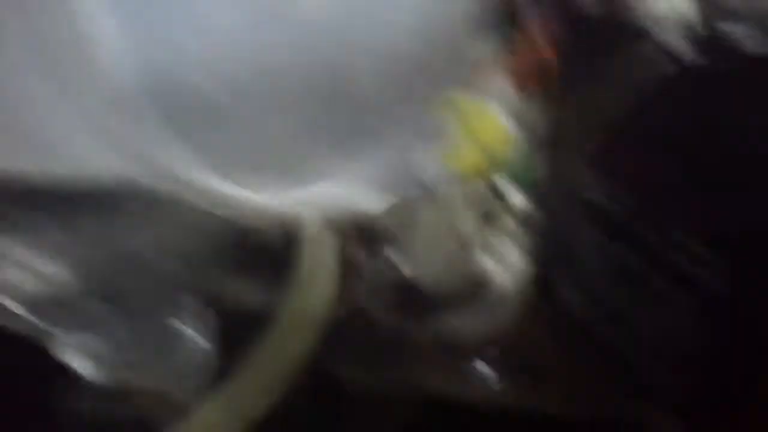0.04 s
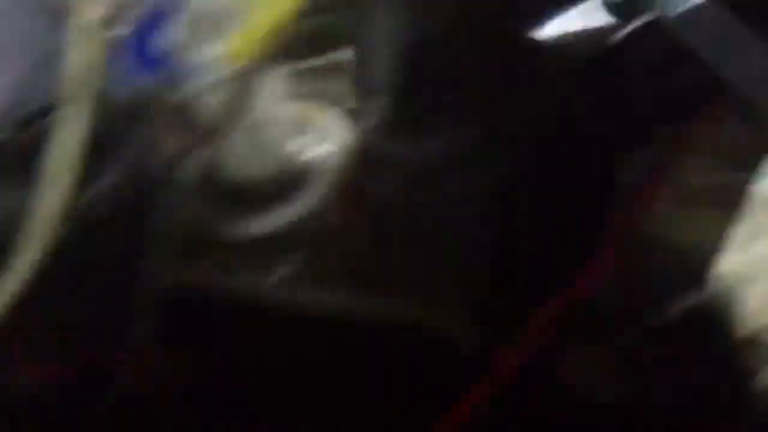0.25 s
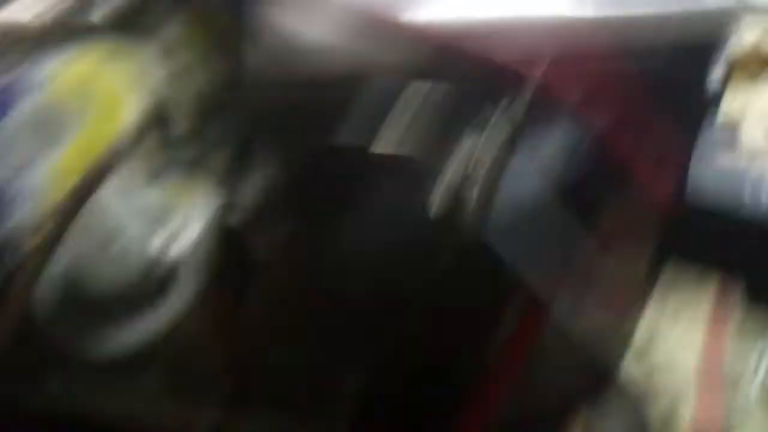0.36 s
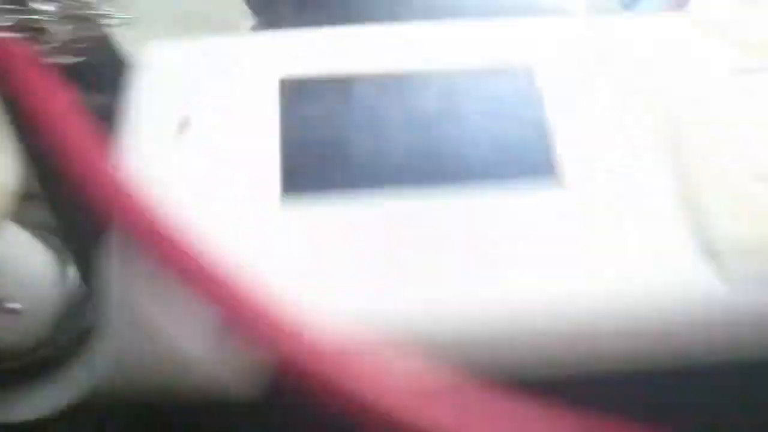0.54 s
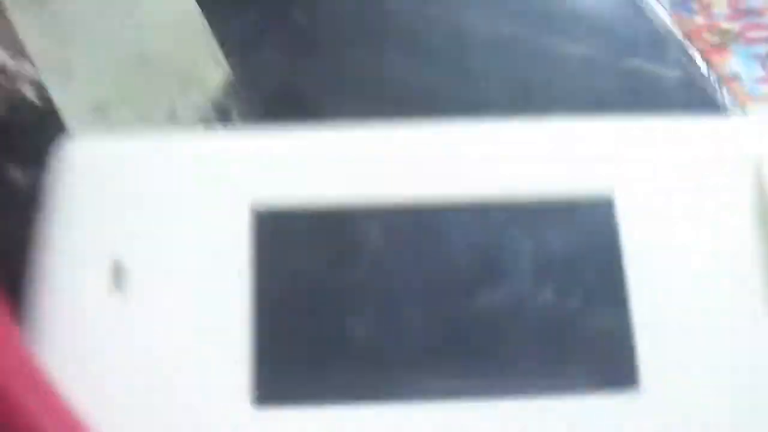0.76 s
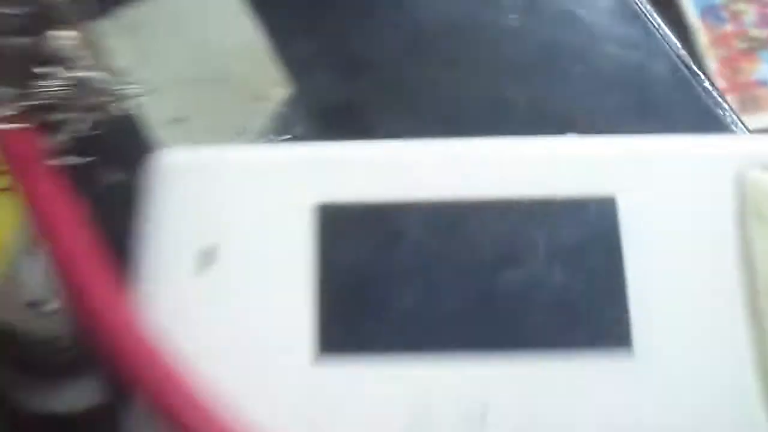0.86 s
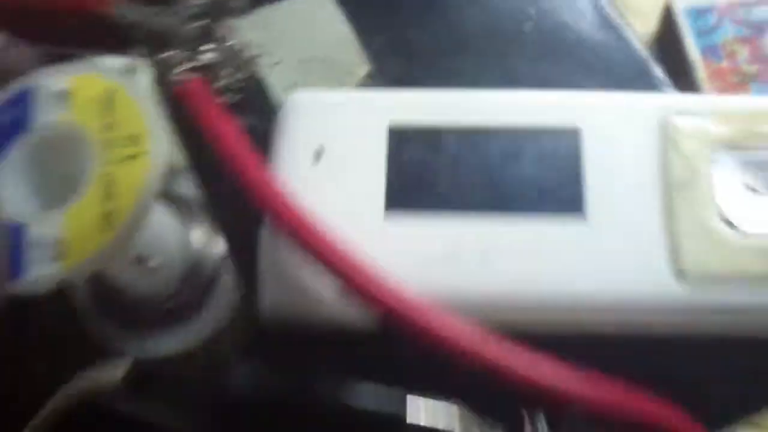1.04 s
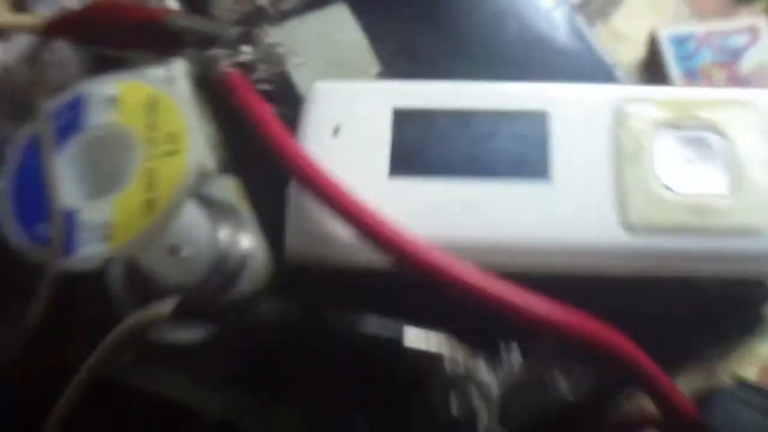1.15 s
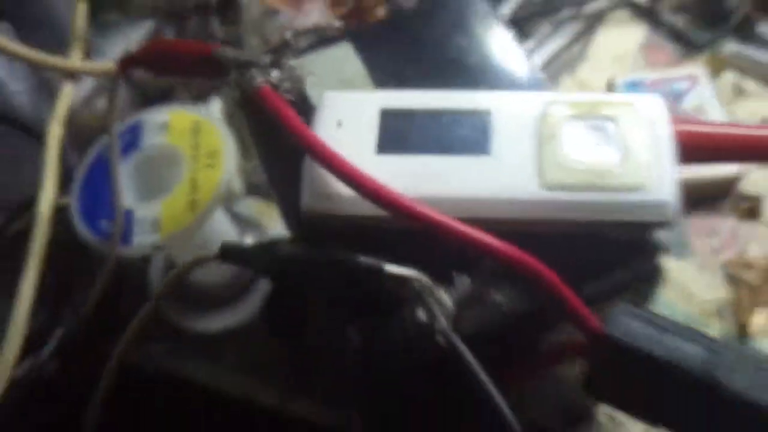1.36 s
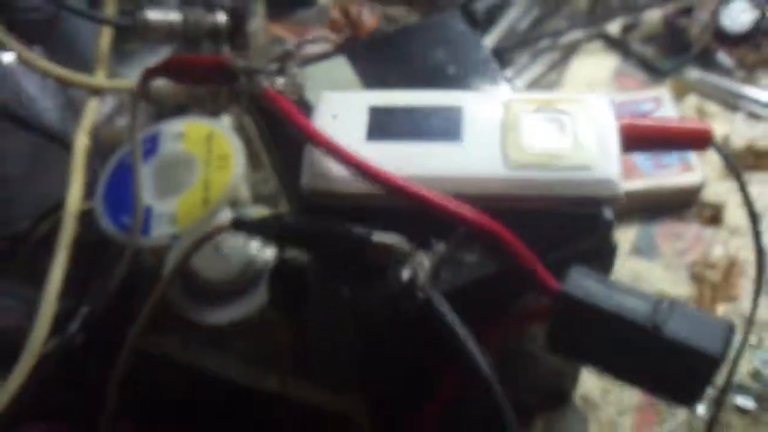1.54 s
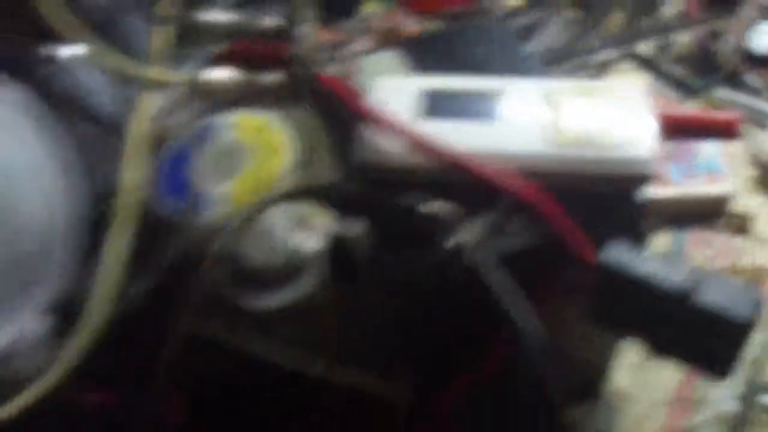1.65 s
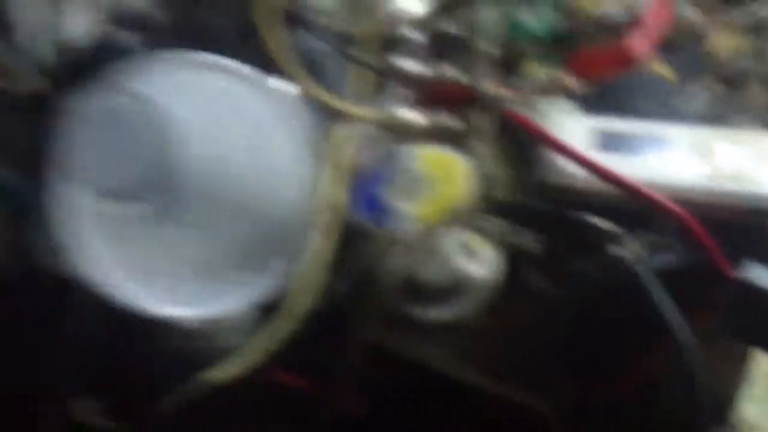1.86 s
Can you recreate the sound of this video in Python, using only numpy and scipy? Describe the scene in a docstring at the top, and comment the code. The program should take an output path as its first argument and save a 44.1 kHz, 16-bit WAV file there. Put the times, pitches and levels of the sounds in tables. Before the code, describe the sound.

A hand bumps and rubs a handheld camera, with quiet electrical hum and hiss behind.

```python
"""A hand rumbles on the case of a handheld camera, right at its microphone, over an electronics bench.
One shift of grip gives a cluster of dull knocks, brushes of skin and small plastic ticks; fainter knocks
and ticks follow. Farther off in the small room, equipment hums, whirs and whines under a steady hiss.
The treble of that background drops away briefly during the cluster."""
import sys
import numpy as np
from scipy import signal
from scipy.fft import rfft, irfft
from scipy.io import wavfile

SR = 44100
rng = np.random.default_rng(int(sys.argv[2]) if len(sys.argv) > 2 else 0)


def store_pcm(level_fs):
    """Save levels as 16-bit WAV."""
    pcm = np.round(np.clip(level_fs, -1, 1) * 32767).astype(np.int16)
    wavfile.write(sys.argv[1], SR, np.atleast_2d(pcm).T)


N = 83790
TIME = np.arange(N) / SR
FREQ = np.fft.rfftfreq(N, 1 / SR)

# Hiss and room air. Each row: frequency in Hz, relative level in dB.
HISS_SPECTRUM = [(25, 13), (100, 10.5), (200, 6.5), (400, 1), (560, 3.5), (700, -2), (980, -1), (1400, -6),
                 (2000, -6), (2700, -7), (3100, -12), (3800, -11.5), (5500, -14.5), (7000, -18),
                 (8600, -21), (10200, -16), (15500, -16.5)]
# Hum of the equipment. Each row: frequency in Hz, average level in dB.
HUM_TONES = [(412, -86), (599, -81.5), (981, -87), (1253, -86), (1988, -101), (2335, -91), (2608, -94)]
# Its whirring resonance and its thin whine. Each row: time in seconds, level in dB.
WHIR_LEVEL = [(0, -78), (.45, -82.5), (.78, -90), (1.05, -80.5), (1.24, -79), (1.31, -79), (1.37, -81),
              (1.47, -83.5), (1.52, -88), (1.59, -76), (1.7, -89), (1.9, -79)]
WHINE_LEVEL = [(0, -86), (1.1, -88), (1.22, -75.5), (1.31, -73), (1.35, -80), (1.41, -94), (1.435, -99),
               (1.465, -72), (1.52, -95), (1.75, -79), (1.9, -81)]
# The hand's deep sway, and skin creeping on the case. Each row: frequency in Hz, relative level in dB.
SWAY_SPECTRUM = [(8, -21.5), (22, 1), (36, 0.5), (55, -8.5), (78, -16.5), (140, -46), (400, -95)]
CREEP_SPECTRUM = [(25, -21), (55, 3), (80, -1), (140, -8), (280, -24), (450, -33.5), (800, -75),
                  (2500, -100)]
# How sway and creep swell and fade. Each row: time in seconds, level in dB.
SWAY_LEVEL = [(0, -56.5), (.07, -50.5), (.18, -52), (.25, -54), (.33, -45), (.38, -55.5), (.5, -56),
              (.62, -56.5), (.72, -49.5), (.8, -51.5), (.9, -50.5), (1.03, -55), (1.13, -52), (1.26, -54.5),
              (1.45, -61), (1.72, -54.5), (1.8, -47.5), (1.9, -68)]
CREEP_LEVEL = [(0, -66.5), (.06, -61.5), (.12, -62.5), (.2, -48.5), (.24, -43), (.33, -46), (.38, -59),
               (.48, -69), (.62, -62), (.8, -70.5), (.88, -54), (.98, -60), (1.06, -62.5), (1.18, -67),
               (1.32, -60), (1.45, -65.5), (1.57, -55), (1.65, -64.5), (1.76, -78), (1.9, -55.5)]
# Fingers knocking on the case.
# Each row: start in seconds, gain in dB, low-pass corner of the contact in Hz, press +1 or release -1.
KNOCKS = [(0.04, -45.5, 204, -1), (0.1864, -43, 310, 1), (0.2118, -40, 403, -1), (0.228, -28.5, 420, -1),
          (0.2323, -25.5, 123.4, -1), (0.2396, -24.5, 95, 1), (.242, -40.5, 333, 1),
          (0.2546, -28.5, 201, -1), (0.259, -21.5, 62, 1), (0.2742, -23, 65, -1), (0.2859, -38.5, 380, -1),
          (0.2887, -22, 116, 1), (0.2911, -39, 330, 1), (0.308, -37, 420, -1), (0.3129, -26, 152, -1),
          (0.3294, -28.5, 110, -1), (0.3364, -30.5, 363, -1), (0.35, -33, 113, -1), (0.3728, -34, 61, 1),
          (0.438, -47, 706, -1), (.571, -53, 700, 1), (0.609, -46.5, 595, -1), (.703, -47, 900, 1),
          (0.745, -54, 900, 1), (0.8298, -47.5, 400, -1), (.857, -50, 405, -1), (.869, -46.5, 220, 1),
          (.886, -53.5, 354, 1), (0.899, -46, 150, -1), (0.939, -64, 600, 1), (0.978, -50.5, 420, -1),
          (1.021, -44, 100, 1), (1.556, -52, 300, -1), (1.688, -50.5, 900, 1), (1.825, -46.5, 149, 1)]
# Low modes of the case. Each row: frequency in Hz, gain in dB, seconds to fall by 60 dB.
CASE_MODES = [(29, -5.5, .094), (81.6, 3, 0.036), (206, -2.5, 0.019), (269, -15.5, 0.016)]
# A finger brushing the case.
# Each row: midpoint in seconds, half-width in seconds, level in dB, centre in Hz, width in octaves.
BRUSHES = [(.172, 0.017, -71, 3700, 0.22), (.2, 0.022, -67, 1030, 0.4), (0.3063, 0.0055, -68.5, 3650, 0.13),
           (0.307, 0.011, -68.5, 1098, 1)]
# Ticks of the plastic. Each row: start in seconds, peak level in dB, centre in Hz, width in octaves.
TICKS = [(0.1928, -51.5, 4020, 0.56), (.199, -45, 1080, 0.7), (.217, -53, 1030, .3),
         (0.3076, -49.5, 1690, 0.58), (0.3082, -45, 800, 0.87), (0.4382, -43.5, 2510, 1.7),
         (0.702, -62.5, 1210, .95), (.746, -57, 1000, 0.58), (1.6, -60, 1400, 0.42),
         (1.691, -56.5, 910, 0.58)]
# Resonances of the plastic. Each row: frequency in Hz, relative level in dB.
PLASTIC_SPECTRUM = [(400, 12.5), (1000, 8.5), (1600, 0), (2200, -5.5), (2550, 4), (3100, -14), (3800, -2.5),
                    (4800, -15), (7000, -24)]


def amp(db):
    """Decibels to gain."""
    return 10 ** (np.asarray(db) / 20)


def colour(points):
    """Gain at every frequency from (Hz, dB) points."""
    hz, db = np.transpose(points)
    return amp(np.interp(np.log(FREQ + 1), np.log(hz), db))


def level(points):
    """Gain at every moment from (s, dB) points."""
    return amp(np.interp(TIME, *np.transpose(points)))


def band(hz, octaves):
    """A bell on the log-frequency axis."""
    return np.exp(-.5 * (np.log2((FREQ + 1) / hz) / octaves) ** 2)


def shaped(x, gain):
    """Filters x by a gain at every frequency."""
    return irfft(rfft(x) * gain, N)


def noise(gain):
    """Noise of rms 1 with the given spectrum."""
    x = shaped(rng.standard_normal(N), gain)
    return x / np.sqrt(np.mean(x ** 2) + 1e-30)


def drift(rate_hz):
    """Slow random wandering of rms 1."""
    return noise(np.exp(-(FREQ / rate_hz) ** 2))


def tone(hz, waver_hz):
    """A sine whose pitch wanders slightly."""
    pitch_hz = hz + waver_hz * drift(rate_hz=12)
    return np.sin(2 * np.pi * (np.cumsum(pitch_hz) / SR + rng.random()))


def hiss(level_db=-65.5):
    """Even hiss of the electronics over the air of the room."""
    return amp(level_db) * noise(colour(HISS_SPECTRUM))


def equipment(waver_db=3, whir_hz=2377, half_width_hz=120):
    """Off on the bench, a faint wavering hum, and a whine and whir that change as the microphone moves."""
    hum = sum(amp(db + waver_db * drift(rate_hz=13)) * tone(hz, waver_hz=3.8) for hz, db in HUM_TONES)
    whine = level(WHINE_LEVEL) * tone(hz=2416, waver_hz=5.4)
    resonance = 1 / (1 + ((FREQ - whir_hz) / half_width_hz) ** 2)
    whir = level(WHIR_LEVEL) * noise(resonance)
    return hum + whine + whir


def hand_rumble():
    """The sway of the hand and the creep of its skin reach the microphone through the case."""
    sway = level(SWAY_LEVEL) * noise(colour(SWAY_SPECTRUM))
    creep = level(CREEP_LEVEL) * noise(colour(CREEP_SPECTRUM))
    return sway + creep


def finger_knocks():
    """Soft contacts push the case around the microphone; it rings low and dies at once."""
    out = np.zeros(N)
    for start, db, contact_hz, direction in KNOCKS:
        age = np.maximum(TIME - start, 0)
        ring = sum(amp(mode_db - 60 * age / t60) * np.sin(2 * np.pi * hz * age)
                   for hz, mode_db, t60 in CASE_MODES)
        soft_contact = signal.butter(4, contact_hz, fs=SR, output="sos")
        out += direction * amp(db) * signal.sosfilt(soft_contact, ring)
    return out


def skin_brushes():
    """Skin slides briefly over the case as the grip shifts."""
    out = np.zeros(N)
    for midpoint, half_width, db, hz, octaves in BRUSHES:
        swell = np.exp(-((TIME - midpoint) / half_width) ** 2)
        out += amp(db) * swell * noise(band(hz, octaves))
    return out


def plastic_ticks(rattle_s=0.00067, rattle_db=-41):
    """Close to the microphone, the plastic gives with a snap and a very short rattle."""
    out = np.zeros(N)
    for start, db, hz, octaves in TICKS:
        decay = (TIME > start) * np.exp(-abs(TIME - start) / rattle_s)
        force = amp(rattle_db) * decay * rng.standard_normal(N)
        force[round(start * SR)] += 1  # the snap
        tick = shaped(force, band(hz, octaves) * colour(PLASTIC_SPECTRUM))
        out += amp(db) * tick / abs(tick).max()
    return out


def treble_dip(x, start_s, end_s, depth_db, corner_hz, edge_s=0.0083):
    """Everything above the corner falls away for a moment."""
    inside = np.clip(np.minimum(TIME - start_s, end_s - TIME) / edge_s + .5, 0, 1)
    treble = shaped(x, 1 - 1 / (1 + (FREQ / corner_hz) ** 8))
    return x + treble * (amp(depth_db * inside) - 1)


def scene():
    """Close handling over the bench background, whose treble dips briefly during the cluster; one microphone."""
    bench = hiss() + equipment()
    bench = treble_dip(bench, start_s=0.2125, end_s=0.3533, depth_db=-24.5, corner_hz=960)
    bench = treble_dip(bench, start_s=0.22, end_s=0.396, depth_db=-6, corner_hz=6300)
    return (bench + hand_rumble() + finger_knocks() + skin_brushes() + plastic_ticks())[None]


def record(dry):
    """The recorder's band limit cuts off the highest treble."""
    low_pass = signal.firwin(511, cutoff=15750, window=("kaiser", 9), fs=SR)
    return signal.oaconvolve(dry, low_pass[None], "same")


dry = scene()
out = record(dry)
store_pcm(out)
```